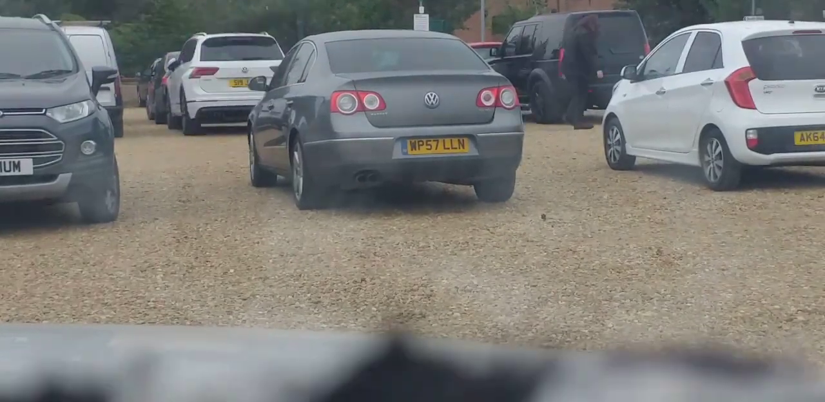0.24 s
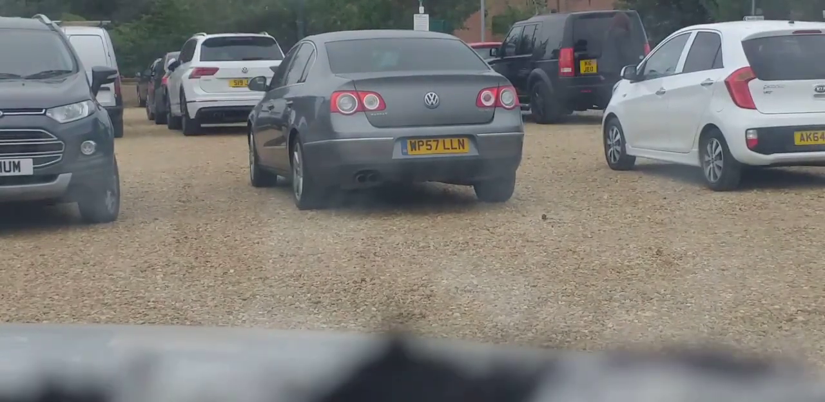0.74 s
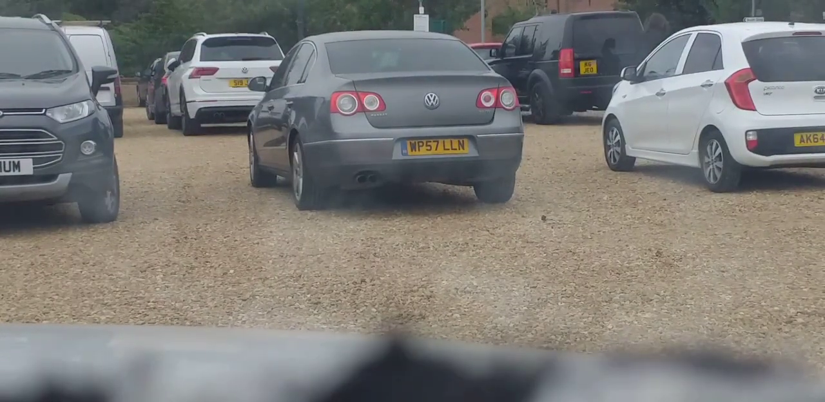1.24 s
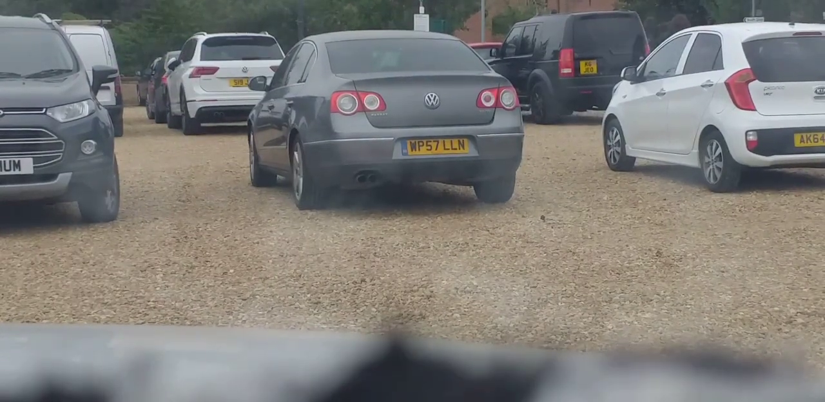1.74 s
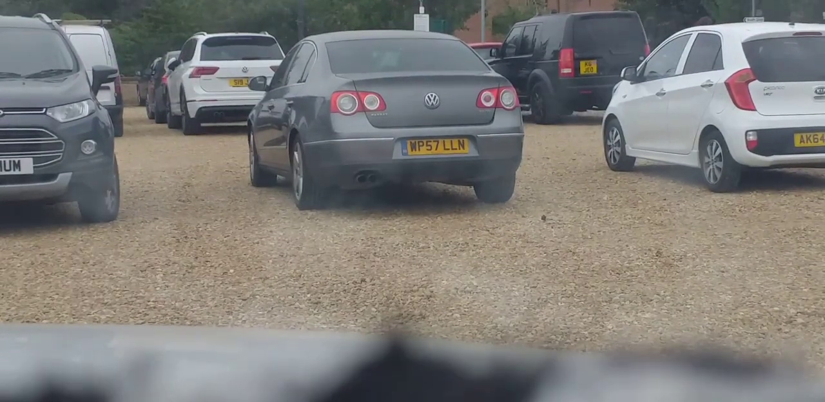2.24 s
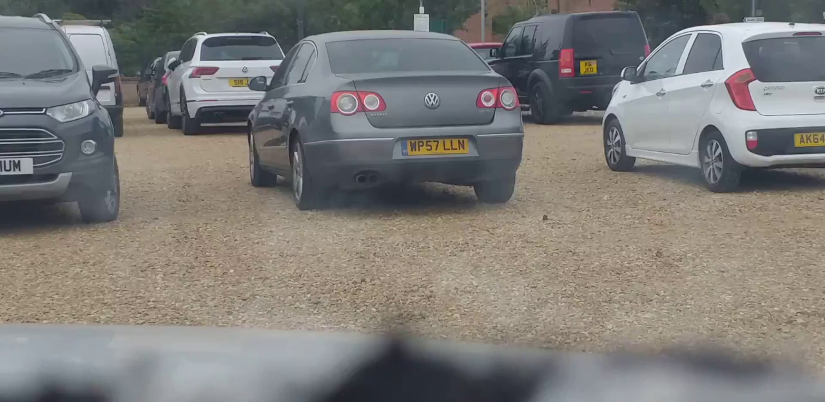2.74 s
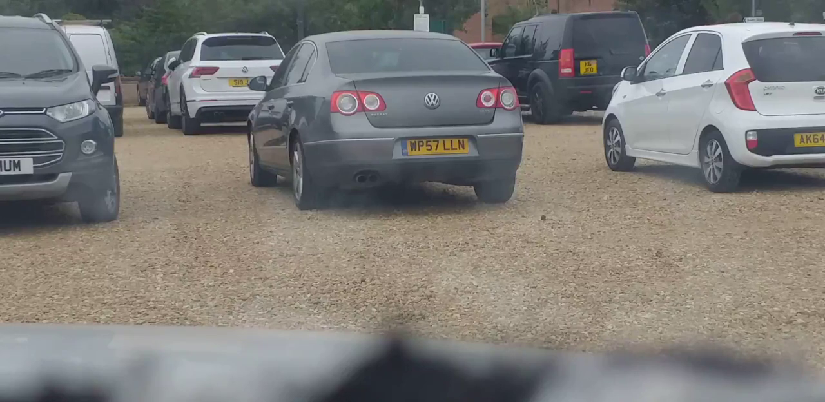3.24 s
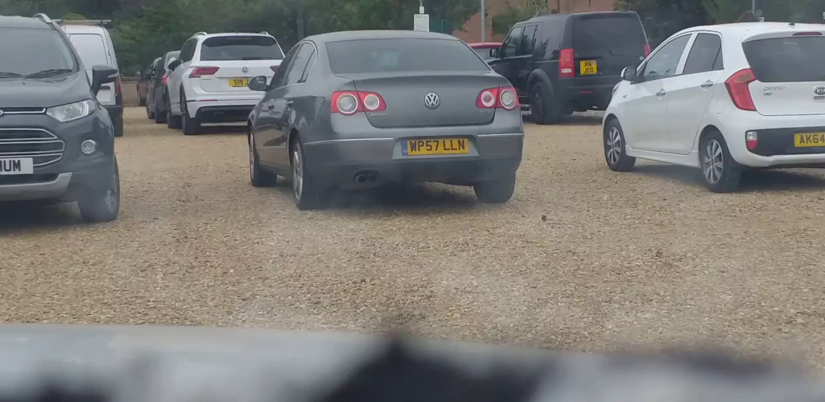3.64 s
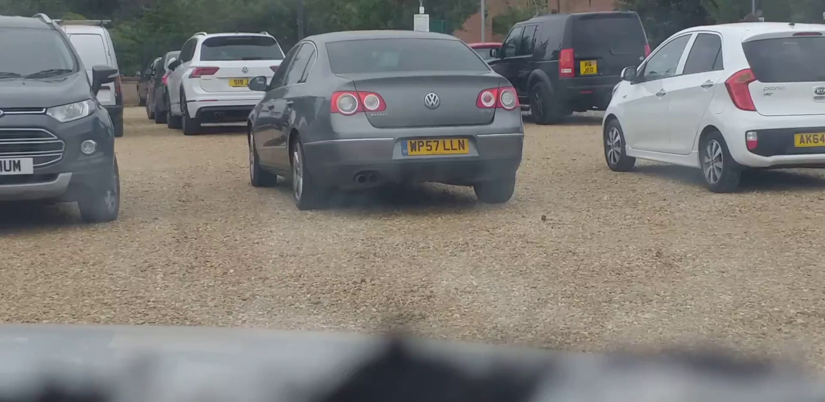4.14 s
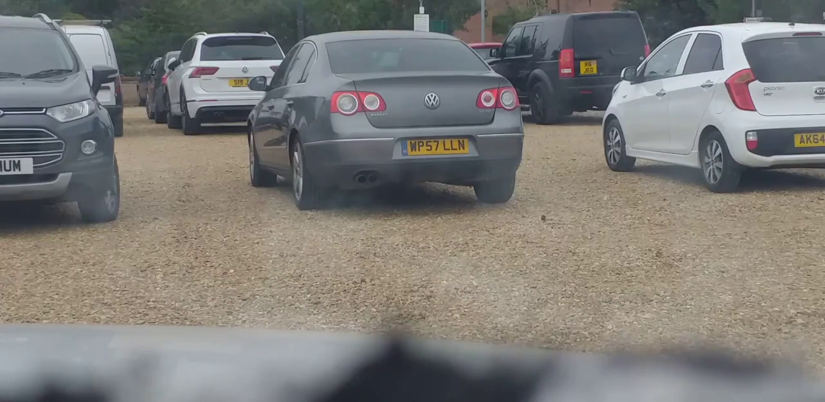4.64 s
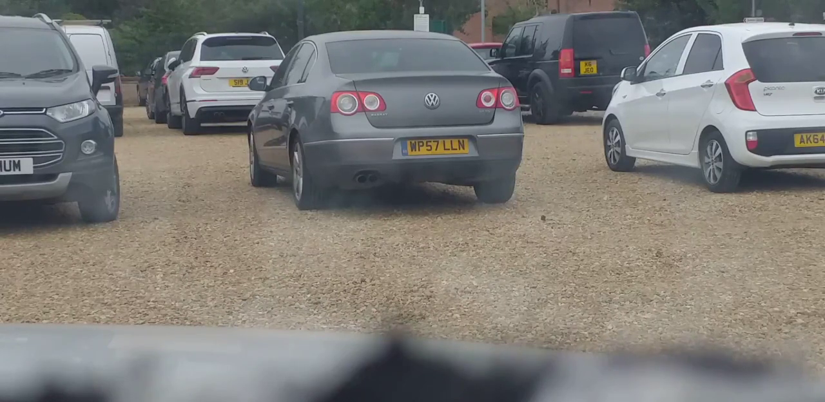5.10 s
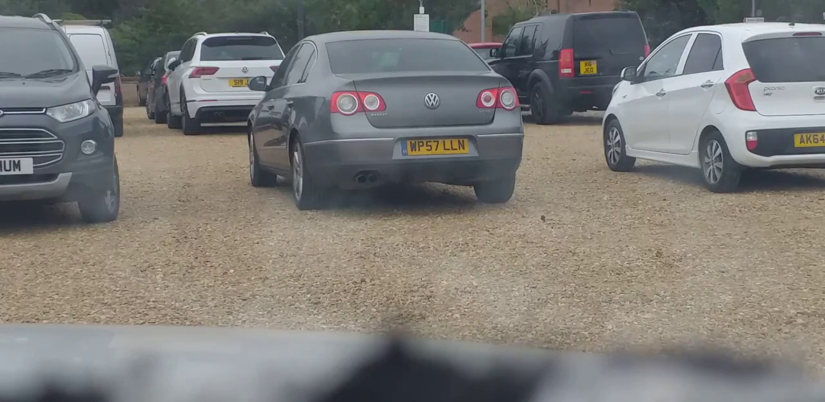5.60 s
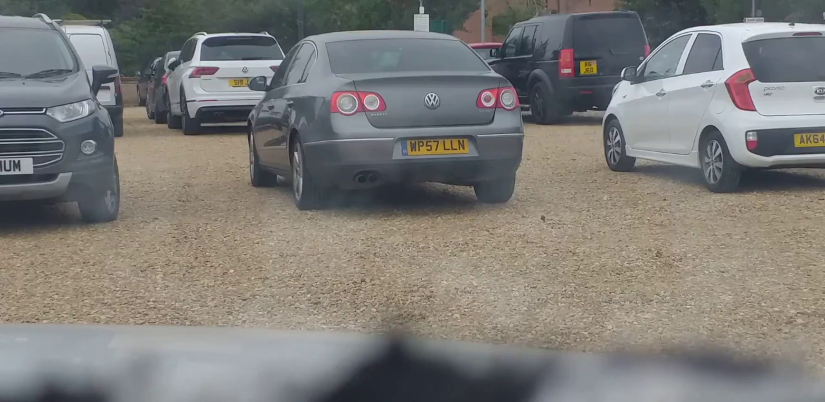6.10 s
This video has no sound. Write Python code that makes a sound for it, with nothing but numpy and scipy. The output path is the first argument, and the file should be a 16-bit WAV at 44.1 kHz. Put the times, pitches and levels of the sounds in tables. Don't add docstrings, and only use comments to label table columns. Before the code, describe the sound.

Someone settles in a car seat: ragged fabric friction, soft body thuds, plastic raps and bright little clicks, a thin pull of webbing and a brief seat chirp. Then the latch gives and the door bangs shut, by far the loudest event, shaking the cabin. Afterwards there are only loose scuffs, faint sleeve brushes and isolated knocks over faint low rumble. Heard close, in a small, dead space.

```python
import sys
import numpy as np
from scipy import signal
from scipy.io import wavfile
from scipy.ndimage import uniform_filter1d

SR = 44100
rng = np.random.default_rng(int(sys.argv[2]) if len(sys.argv) > 2 else 0)


def store_pcm(level_fs):
    pcm = np.round(np.clip(level_fs, -1, 1) * 32767).astype(np.int16)
    wavfile.write(sys.argv[1], SR, np.atleast_2d(pcm).T)


def voltage_ratio(decibels):
    exponent = np.asarray(decibels, float) / 20
    return 10 ** exponent


N = 280476
TIME_S = np.arange(N) / SR
MIDDLE_DB = -57


def evened(x):
    return x / np.sqrt(np.mean(x ** 2) + 1e-20)


def add(mix, start_s, sound):
    part = mix[round(start_s * SR):][:len(sound)]
    part += sound[:len(part)]


def read(points, hz):
    f, db = np.transpose(points)
    return np.interp(np.log(hz + 1), np.log(f + 1), db, -90, -90)


def along(rows, column):
    rows = np.array(rows)
    return np.interp(TIME_S, rows[:, 0], rows[:, column])


def lowpass(x, hz):
    return signal.sosfilt(signal.butter(2, hz, fs=SR, output="sos"), x)


def stroke(start_s, length_s, db, ease_s=0.1):
    t = TIME_S - start_s
    return voltage_ratio(db) * np.clip(np.minimum(t, length_s - t) / ease_s, 0, 1) ** 2


def friction(colour, size, patch_db, flicker_db):
    hop = size // 4
    frames = N // hop + 5
    hz = np.fft.rfftfreq(size, 1 / SR)
    a, b, patches = rng.standard_normal((frames, len(hz), 3)).T
    patches = uniform_filter1d(patches, size=5, axis=0)
    patches = evened(uniform_filter1d(patches, size=16, axis=1))
    flicker = evened(uniform_filter1d(rng.standard_normal(frames), size=4))
    level_db = read(colour, hz)[:, None] + patch_db * patches + flicker_db * flicker
    z = (a + 1j * b) * voltage_ratio(level_db)
    return evened(signal.istft(z, nperseg=size, noverlap=size - hop)[1][:N])


def strike(events, modes, scatter, size):
    out, t = np.zeros(N), np.arange(SR // 8) / SR
    ring_t = t[:size]
    hz, db, t60_s = np.transpose(modes)[:, :, None]
    for start_s, peak_db, centre_hz, spread_oct, contact_s, rise in events:
        weight_move, pitch_move = rng.standard_normal((2, len(modes), 1))
        far_db = 6 * (np.log2(hz / centre_hz) / spread_oct) ** 2
        weight_db = db - np.minimum(far_db, 23) + 1.5 * weight_move
        tone = np.sin(2 * np.pi * hz * (1 + scatter * pitch_move) * ring_t)
        soft_start = 1 - np.exp(-ring_t * hz * 2.5)
        ring = voltage_ratio(weight_db - 60 * ring_t / t60_s) * tone * soft_start
        u = t / max(contact_s, 5e-4)
        grit = rng.standard_normal(len(u)) * voltage_ratio(2.91 * rng.exponential(1, len(u)))
        burst = grit * (1 - np.exp(-u / max(rise, 0.02))) * np.exp(-u)
        sound = signal.fftconvolve(burst, ring.sum(0))
        add(out, start_s, voltage_ratio(peak_db) * sound / abs(sound).max())
    return out


def touches(rows, spread_oct, rise):
    return [(*row[:3], spread_oct, row[3], rise) for row in rows]


# frequency in Hz, level in dB.
TRIM_COLOUR = [(400, -8.5), (1000, -3.5), (2100, 2), (3000, 2.5), (6500, 10), (7400, 0.5), (8800, -6),
               (11500, -6.5), (15500, -9.5)]


def strike_trim(events):
    hz = np.geomspace(420, 15400, 64)
    modes = np.transpose([hz, read(TRIM_COLOUR, hz), 0.004 + 11 / hz])
    return strike(events, modes, scatter=0.012, size=1000)


# frequency in Hz, density in dB per Hz.
QUIET = [(100, -45), (170, -11.5), (213, 3), (273, -21), (438, -34), (571, -26.5), (616, -31.5),
         (1290, -36), (4670, -37), (7500, -42), (8730, -43), (15700, -35.5)]


def quiet():
    return voltage_ratio(-69.5) * friction(QUIET, size=512, patch_db=2.0, flicker_db=0.5)


# level in dB, t60 in seconds.
SHUDDER = [
    (-43.5, 1.1),
    (-51.5, .9),
    (-45, 1.1),
    (-52, 0.26),
]


def shudder(db, t60_s, shut_s=3.8, rise_s=0.04):
    t = np.maximum(TIME_S - shut_s, 0)
    return voltage_ratio(db - 60 * t / t60_s) * (1 - np.exp(-t / rise_s))


# time in seconds, load in dB.
WEIGHT = [(0.0, -56.5), (0.12, -57), (0.32, -54), (0.5, -56.5), (0.7, -54.5), (0.81, -48.5), (0.96, -51),
          (1.45, -49.5), (1.7, -54.5), (2.12, -52.5), (2.36, -53.5), (3.08, -51.5), (3.3, -54.5),
          (3.56, -55), (3.72, -59.5), (4.25, -63), (4.6, -73), (6.36, -77)]
# frequency in Hz, density in dB per Hz.
RUMBLE = [(18, -47.5), (30, -16), (40, -9.5), (59, 13.5), (90, 4), (120, -30), (200, -120)]
BOOM = [(47, -36), (80, -1), (113, 1), (160, -16.5), (210, -33), (350, -120)]
DRUM = [(76, -28.5), (130, 2), (162, -11.5), (203, 0.5), (333, -4.5), (367, -2), (398, -6), (600, -28),
        (780, -51.5), (1320, -120)]


def body():
    load_db = along(WEIGHT, column=1) - MIDDLE_DB
    street = voltage_ratio(-66 + 6 * np.maximum(TIME_S - 4.46, 0))
    low = np.hypot(street, voltage_ratio(-61 + 0.36 * load_db))
    mid = voltage_ratio(-58.5 + 0.8 * load_db)
    high = voltage_ratio(MIDDLE_DB + load_db)
    low, mid, high = [np.hypot(gain, shudder(*row)) for gain, row in zip((low, mid, high), SHUDDER)]
    rumble = low * friction(RUMBLE, size=4096, patch_db=1.0, flicker_db=2.0)
    boom = mid * friction(BOOM, size=4096, patch_db=0.1, flicker_db=0.4)
    drum = high * friction(DRUM, size=1024, patch_db=0.0, flicker_db=0.85)
    return rumble + boom + drum


# start in seconds, length in seconds, level in dB, centre in Hz, width in Hz.
WHISPERS = [(0.001, .2, -68, 1004, 895), (2.197, .45, -63.5, 5860, 300), (3.35, 0.16, -68, 2750, 250),
            (3.705, .03, -67, 7000, 500), (3.85, 0.29, -73, 2080, 350), (3.879, 0.22, -70, 3970, 600),
            (3.97, 0.12, -70.5, 5500, 1500), (5.63, 0.027, -63.5, 1150, 231.5),
            (5.69, 0.053, -64, 1990, 250), (6.6, 0.07, -64, 1150, 250), (6.04, .075, -76, 3600, 400),
            (6.041, .075, -78, 2500, 600), (6.18, 0.06, -75.5, 1400, 300)]


def whispers():
    out = np.zeros(N)
    for start_s, length_s, db, hz, width_hz in WHISPERS:
        t = np.arange(0, length_s, 1 / SR)
        a, b = rng.standard_normal((2, SR // 2))[:, :len(t)]
        fuzz = lowpass(a + 1j * b, width_hz / 2)
        band = evened((fuzz * np.exp(2j * np.pi * hz * t)).real)
        add(out, start_s, voltage_ratio(db) * band * np.sqrt(np.sin(np.pi * t / length_s)))
    return out


# time in seconds, pressure in dB, speed as extra treble in dB.
CLOTH = [(0.0, -64.5, 1.5), (0.15, -59.5, -2.5), (0.3, -49, -1.5), (0.48, -46.5, 3.5), (0.66, -51.5, 0.5),
         (0.73, -58.5, 0.5), (0.8, -54, 1), (1.05, -49.5, -2), (1.25, -51.5, -3), (1.45, -55.5, -1.5),
         (1.63, -53.5, 4), (1.79, -62.5, -3), (2.04, -57.5, 4), (2.2, -54, 2.5), (2.55, -56.5, 3),
         (3.13, -62, 0), (3.49, -63, 3.5), (3.77, -71, -5), (4.3, -73.5, 2.5), (4.6, -76.5, 2)]
# start in seconds, length in seconds, level in dB.
BRUSHES = [
    (3.987, 0.2, -55),
    (4.939, 0.27, -69),
    (5.567, 0.415, -68),
    (5.746, 0.18, -62),
]
# frequency in Hz, density in dB per Hz.
HISS = [(1470, -29.5), (2500, -11.5), (3740, -7.5), (4490, -1.5), (4860, -3), (6530, 1.5), (7310, -6),
        (8400, -22.5), (9500, -27), (12400, -63.5), (20900, -120)]
SCRAPE = [(260, -32.5), (450, -4), (654, -1.5), (772, -2), (903, -2), (1250, -3.5), (1380, -3.5),
          (2290, -5.5), (3600, -8), (4680, -19.5), (7920, -120)]
AIR = [(5000, -32), (8500, -13), (9080, -10), (11300, -1.5), (15100, -3.5), (16000, 4)]


def cloth():
    press_db = along(CLOTH, column=1) - MIDDLE_DB
    speed_db = along(CLOTH, column=2)
    rest = voltage_ratio(-81.5)
    hiss_gain = np.maximum(voltage_ratio(MIDDLE_DB + press_db) - rest, 0)
    scrape_gain = np.maximum(voltage_ratio(-57.5 + 0.84 * press_db - 0.97 * speed_db) - rest, 0)
    scrape_gain = np.hypot(scrape_gain, shudder(*SHUDDER[-1]))
    air_gain = voltage_ratio(-70.5 + 0.99 * press_db + speed_db)
    hiss = hiss_gain * friction(HISS, size=256, patch_db=1.5, flicker_db=0.5)
    rasp = friction(SCRAPE, size=512, patch_db=2.5, flicker_db=0.82)
    brush = sum(stroke(*row) for row in BRUSHES) * lowpass(rasp, 2280)
    air = air_gain * friction(AIR, size=256, patch_db=-0.5, flicker_db=0.6)
    return hiss + scrape_gain * rasp + brush + air


# frequency in Hz, density in dB per Hz.
FIZZ = [(11000, -26), (13000, -1), (15700, 1)]
DRAG = [(420, -8), (600, 0.5), (1100, -4), (1350, -23)]


def webbing():
    pull_s, drag_s = 2.17, 2.64
    fuzz = evened(uniform_filter1d(rng.standard_normal(N), size=120))
    whine_hz = 4600 - 260 * (TIME_S - pull_s)
    whine = stroke(pull_s, 0.52, -60) * fuzz * np.sin(2 * np.pi * np.cumsum(whine_hz) / SR)
    fizz_gain = stroke(pull_s, 0.74, -66.5) + stroke(3.36, 0.29, -75)
    fizz = fizz_gain * friction(FIZZ, size=256, patch_db=1.0, flicker_db=-0.5)
    drag_gain = stroke(drag_s, 1.05, -58) * voltage_ratio(-4.5 * (TIME_S - drag_s))
    drag = drag_gain * friction(DRAG, size=1024, patch_db=3.5, flicker_db=1.0)
    return whine + fizz + drag


# start in seconds, level in dB, start pitch in Hz, end pitch in Hz, length in seconds.
SQUEAKS = [
    (.385, -46, 753, 790, 0.029),
    (2.899, -53, 900, 855, 0.059),
    (3.035, -44, 790, 740, 0.04),
]


def squeaks():
    out = np.zeros(N)
    for start_s, db, hz, end_hz, length_s in SQUEAKS:
        pitch_hz = np.linspace(hz, end_hz, round(length_s * SR))
        fuzz = uniform_filter1d(rng.standard_normal(SR // 8), size=300)[:len(pitch_hz)]
        waver = 1 + 0.4 * evened(fuzz)
        tone = np.sin(2 * np.pi * np.cumsum(pitch_hz) / SR)
        add(out, start_s, voltage_ratio(db) * waver * tone * np.hanning(len(pitch_hz)))
    return out


# start in seconds, peak in dB, centre in Hz, contact in seconds.
FLECKS = [(1.0751, -42, 9000, .004), (1.0951, -43, 12000, .006), (1.19, -45, 2500, .03),
          (1.3101, -38, 5900, .006), (1.5806, -35, 12000, .003), (1.5859, -38, 12500, .007),
          (1.6063, -35, 12000, .002), (1.6181, -41, 12000, .002), (1.6261, -38, 12000, .003),
          (1.6441, -45, 6300, .002), (1.692, -46, 6300, .004), (2.0621, -45, 11000, .004),
          (2.0901, -43, 2500, .003), (2.1041, -44, 13000, .002), (2.5141, -45, 2100, .002),
          (3.1281, -44, 3800, .002), (3.1656, -31, 5000, .006), (3.1661, -35, 14500, .005),
          (4.0121, -48, 5500, .005), (4.051, -57, 6000, .03), (4.521, -60, 800, .004),
          (4.9451, -54, 11100, .023), (5.0301, -55, 11500, .02), (5.0461, -50, 6550, .0065),
          (5.8121, -47, 11500, .02), (5.861, -55.5, 12100, .037), (5.8751, -49.5, 6700, .008)]
# start in seconds, peak in dB, centre in Hz, spread in octaves, contact in seconds.
TICKS = [(1.2841, -44, 6300, .25, .002), (1.2971, -43, 6000, .3, .002), (1.9821, -42, 4000, 1.2, .002),
         (3.7281, -46, 6800, .3, .004), (3.7556, -36, 6500, 1.2, .006), (3.7651, -42, 5000, 1.5, .012),
         (3.7741, -39, 4000, 1.5, .008), (3.7951, -31, 13500, .6, .008), (3.851, -41, 650, .6, .03),
         (4.1341, -45, 1800, 1, .003), (4.9381, -49, 1150, .4, .004), (4.9611, -48, 1500, .8, .006),
         (5.0281, -46, 1500, .8, .003), (5.7981, -46, 4000, 1, .015), (5.8076, -36, 500, .4, .002)]


def grit():
    ticks = [(*row, 0.1) for row in TICKS]
    return strike_trim(touches(FLECKS, spread_oct=0.34, rise=0.058) + ticks)


# start in seconds, peak in dB, centre in Hz, contact in seconds.
THUDS = [(.282, -34, 283, 0.0027), (.757, -36.5, 297, 0.027), (.767, -30.5, 94, 0.011),
         (1.103, -32.5, 108, 0.0074), (1.283, -34, 99, 0.017), (1.313, -31.5, 94.5, 0.022),
         (1.35, -34, 99, 0.0063), (2.699, -36, 92, 0.0073), (3.083, -35, 102, 0.0048),
         (3.135, -34, 166, 0.01), (3.707, -31.5, 96, 0.0062), (3.725, -35, 200, 0.0056),
         (3.755, -29, 200.4, 0.022), (3.8, -19.5, 172, 0.011), (3.849, -32, 150.6, 0.018),
         (3.89, -45.5, 249, 0.03), (3.99, -38, 150.8, 0.036), (4.085, -44.5, 184, 0.0089),
         (4.352, -42.5, 360, 0.011), (4.39, -48.5, 357.6, .008), (4.968, -42.5, 364, 0.018),
         (5.031, -47.5, 360, 0.012), (5.115, -59.5, 347, 0.01), (5.606, -45, 381, 0.011),
         (5.807, -47.5, 436, 0.018)]
# frequency in Hz, level in dB, t60 in seconds.
PANEL = [(107.5, -2.5, 0.12), (190, -2.5, 0.08), (254, -5, 0.094), (302, -5.5, 0.19), (347.4, 0, 0.12),
         (493, -6, 0.0088)]


def thuds():
    return strike(touches(THUDS, spread_oct=1.03, rise=0.6), PANEL, scatter=0.02, size=5000)


# start in seconds, peak in dB, centre in Hz, contact in seconds.
RAPS = [(.284, -49, 500, 0.0041), (.759, -46, 520, 0.015), (1.078, -36.5, 630, 0.017),
        (1.301, -35.5, 796, 0.014), (2.008, -36, 1690, 0.033), (2.052, -42.5, 713, 0.038),
        (2.088, -34.5, 2010, 0.0089), (2.121, -39, 1200, 0.0071), (2.698, -29, 1070, 0.011),
        (3.168, -31.5, 1030, 0.0095), (3.708, -47, 600, .012), (3.727, -31, 899, .016),
        (3.755, -36, 1189, 0.015), (4.133, -46, 890, 0.0063), (5.608, -56.5, 476, 0.014),
        (5.807, -28, 490, 0.013)]
TAPS = [(.2835, -36, 870, 0.0045), (4.936, -46.5, 1260, 0.056), (4.968, -38.5, 1120, 0.011),
        (5.39, -61, 1599, 0.0081), (5.418, -45, 1650, 0.013), (5.58, -60.5, 647, .015),
        (5.63, -63, 1050, 0.01), (5.70, -54.5, 1894, 0.027), (5.715, -52.5, 1150, 0.012),
        (5.817, -27.5, 1260, 0.0035)]
SCUFFS = [(4.064, -42.5, 770, 0.013), (4.082, -40.5, 678, .015), (4.326, -51.5, 1500, 0.021),
          (4.354, -37.5, 1390, 0.022), (4.384, -33, 1320, 0.014), (4.43, -58, 1997, .025),
          (4.966, -37, 1503, 0.014), (5.031, -35.5, 1420, .015), (5.115, -54.5, 600, 0.0094),
          (5.64, -59, 500, 0.02), (5.788, -37.5, 1212, 0.019), (5.817, -33, 1360, 0.0084),
          (5.87, -48.5, 1280, 0.018)]
SNAPS = [(.802, -49, 6000, 0.014), (1.29, -28, 6300, 0.003), (1.301, -24, 6070, 0.0044),
         (1.58, -37, 6400, 0.014), (1.5994, -32.5, 6150, 0.0097), (1.6244, -51, 5730, 0.004),
         (1.9804, -37, 6500, 0.0035), (2.104, -26, 5940, 0.0022), (2.3326, -32, 5800, 0.0026),
         (2.7145, -26.5, 5550, 0.0032), (3.1275, -45, 3780, 0.014), (3.1652, -25, 5400, 0.0067),
         (3.756, -43, 3740, 0.008), (4.012, -48, 5000, 0.013), (4.937, -56, 6550, 0.021),
         (5.008, -57, 6100, 0.005), (5.0457, -57.5, 6500, 0.0083), (5.87, -51, 5980, 0.033)]
CRACKLES = [(.6325, -37, 5370, 0.012), (.8365, -41, 5840, 0.016), (.8799, -36, 4600, 0.01),
            (.9552, -32, 6220, .007), (1.075, -31.5, 6220, 0.019), (2.009, -36.5, 3660, 0.0047),
            (2.0496, -30, 5100, 0.021), (2.8594, -42, 5900, 0.0043), (3.1754, -30, 6020, 0.0045),
            (4.354, -37, 5930, 0.014), (4.3763, -34.5, 5910, 0.019), (4.4291, -55, 5990, 0.029),
            (4.9672, -49.5, 6030, 0.036), (5.8099, -30.5, 5110, 0.015), (5.9564, -55.5, 6670, 0.017)]
# start in seconds, peak in dB.
SPRAY = [(0.802, -36.5), (0.8363, -32.5), (1.3, -36), (1.581, -35), (1.605, -48), (2.0115, -36),
         (3.165, -38), (3.7963, -40), (4.3776, -34), (4.969, -41.5), (5.0467, -44.5), (5.803, -46)]


def hard_touches():
    events = touches(RAPS, spread_oct=1, rise=0.22)
    events += touches(TAPS, spread_oct=0.27, rise=0.31)
    events += touches(SCUFFS, spread_oct=0.82, rise=0.49)
    events += touches(SNAPS, spread_oct=0.27, rise=0.2)
    events += touches(CRACKLES, spread_oct=1, rise=0.29)
    spray = [(start_s, db, 12500, 0.013) for start_s, db in SPRAY]
    return strike_trim(events + touches(spread_oct=0.7, rise=0.3, rows=spray))


# start in
# seconds, peak in dB, frequency in Hz, t60 in seconds.
RINGS = [(.2835, -37, 850, .03), (.7521, -24, 100, .12), (.7561, -41, 720, .074), (.7571, -33, 225, .08),
         (.7581, -26, 320, .094), (.7586, -38, 780, .03), (.7861, -32, 190, .049), (.7871, -29, 361, .08),
         (.7881, -37, 105, .084), (.8301, -42, 220, .15), (1.2904, -33, 6400, .02),
         (1.2926, -36, 5900, .02), (1.3013, -26, 6300, .025), (1.3031, -31, 5700, .03),
         (1.3056, -33, 6100, .03), (1.3101, -31, 202, .08), (1.3111, -34, 380, .05),
         (1.3141, -37, 5900, .03), (2.6981, -36, 1370, .024), (3.0051, -39, 130, .06),
         (3.0121, -45, 800, .043), (3.0401, -40.5, 397, .096), (3.0791, -36, 352, .05),
         (3.0821, -50, 790, .04), (3.1291, -43, 200, .04), (3.1421, -40.5, 605, .042),
         (3.1511, -37, 109, .088), (3.1661, -37, 1064, .058), (3.1663, -29, 5100, .025),
         (3.1671, -33, 6700, .04), (4.3541, -43.5, 1147, .06), (4.9671, -39.5, 1095, .074),
         (5.0461, -50, 780, .036), (5.4181, -46.5, 1604, .054), (5.6081, -47, 477, .059),
         (5.7201, -54, 1080, .08), (5.8061, -31, 520, .045), (5.8181, -35.5, 1320, .04),
         (3.703, -47, 200, 0.039), (3.713, -39.5, 890, 0.037), (3.724, -42, 1970, .03),
            (3.726, -26, 470, 0.04), (3.729, -40, 1020, 0.039), (3.735, -30, 378, 0.36),
            (3.7942, -13.5, 416, 0.033), (3.796, -22, 250, .06), (3.7965, -20.5, 620, .03),
            (3.7968, -14, 1744, .03), (3.797, -14.5, 940, 0.053), (3.799, -14.5, 1082, 0.046),
            (3.8, -20, 201.5, 0.12), (3.805, -27, 135.2, .15), (3.81, -27, 366, .1),
            (3.837, -36, 111, 0.092), (3.861, -31.5, 243, 0.16), (3.882, -31, 256, .07),
            (3.91, -32.5, 90, 0.11), (3.915, -31, 190, 0.1), (3.915, -51.5, 674, 0.15),
            (3.955, -30.5, 169, 0.09), (3.992, -28, 130, 0.07), (4.005, -34.5, 200, 0.14),
            (4.039, -37.5, 332, 0.084), (4.062, -41.5, 750, 0.066), (4.068, -33, 288, 0.065),
            (4.08, -42, 680, 0.14), (4.082, -34.5, 190, 0.16), (4.086, -40, 385, 0.13),
            (4.095, -43, 1006, 0.055), (4.133, -44.5, 742, .04), (4.134, -54, 2300, .02),
            (4.15, -45.5, 108.7, 0.12)]


def rings():
    out, t = np.zeros(N), np.arange(SR // 5) / SR
    for start_s, db, hz, t60_s in RINGS:
        swell = 1 - np.exp(-t * hz / 0.65)
        add(out, start_s, voltage_ratio(db - 60 * t / t60_s) * swell * np.sin(2 * np.pi * hz * t))
    return out


# frequency in Hz, level in dB, t60 in seconds.
DOOR = [(110, -5, .13), (200, -2, .12), (290, -7, .07), (380, -3, .09), (540, -8, .04), (680, -10, .03),
        (940, 0, .024), (1075, 0, .024), (1680, -10, .015), (1840, -6, .015), (2090, 3, .02),
        (2630, -9, .015)]
# start in seconds, peak in dB, centre in Hz, spread in octaves, contact in seconds.
SLAM = [
    (3.7955, -9, 2600, 0.23, 0.0016),
    (3.8005, -18, 1900, 0.6, 0.0048),
    (3.798, -17, 550, 1.3, 0.01),
]
RATTLE = [
    (3.79, -28, 3990, 1.7, 0.0055),
    (3.7935, -7, 3002, 1.34, 0.0059),
    (3.80, -16.5, 2000, 0.94, 0.0097),
]


def slam():
    door = strike([(*row, 0.37) for row in SLAM], DOOR, scatter=0.005, size=5000)
    return door + strike_trim([(*row, 0.54) for row in RATTLE])


# frequency in Hz, gain in dB.
SHELL = [(6400, -0.5), (7500, -5), (8100, -16), (9500, -15), (11000, -5), (13000, -1.5), (16000, -1)]


def shaded(x):
    hz = np.linspace(0, SR / 2, 65)
    gain = voltage_ratio(np.interp(hz, *np.transpose(SHELL)))
    return signal.oaconvolve(x, signal.firwin2(129, hz, gain, fs=SR), "same")


def cabin(x, t60_s=0.082):
    t = np.arange(SR // 5) / SR
    taps = rng.standard_normal((3, len(t))) * voltage_ratio(-60 * t / t60_s) * (t > 0.002)
    turns = np.cos(2 * np.pi * (TIME_S * 35 + np.arange(3)[:, None] / 3))
    echoes = signal.fftconvolve(x * turns, taps / np.linalg.norm(taps[0]), axes=1)
    return echoes[:, :N].sum(0)


def scene():
    hits = shaded(thuds() + hard_touches() + slam() + squeaks() + rings())
    mono = quiet() + body() + whispers() + cloth() + webbing() + shaded(grit())
    mono += hits + voltage_ratio(-14) * cabin(hits)
    return np.array([mono, mono])


def top_cut(x):
    return signal.sosfilt(signal.butter(12, 16800, fs=SR, output="sos"), x)


def record(dry):
    x = signal.sosfilt(signal.butter(4, 42, "high", fs=SR, output="sos"), dry)
    treble = signal.sosfilt(signal.butter(2, 7000, "high", fs=SR, output="sos"), x[0])
    side = voltage_ratio(-19.5) * treble * evened(uniform_filter1d(rng.standard_normal(N), size=60))
    side += voltage_ratio(-66) * np.roll(x[0], 40)
    x = x + np.outer([1, -1], side)
    band_limit = signal.firwin(1023, 15750, window=("kaiser", 9), fs=SR)
    x = signal.oaconvolve(x, band_limit[None], "same")
    fade = np.clip((N - np.arange(N)) / (0.0029 * SR), 0, 1)
    return top_cut(x * fade)


dry = scene()
out = record(dry)
store_pcm(out)
```